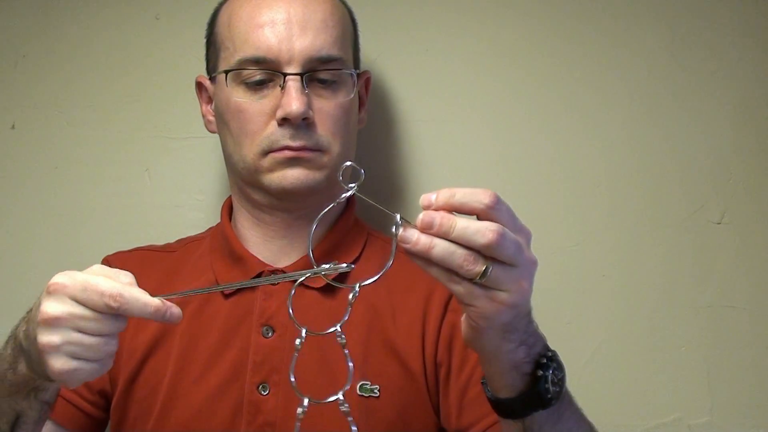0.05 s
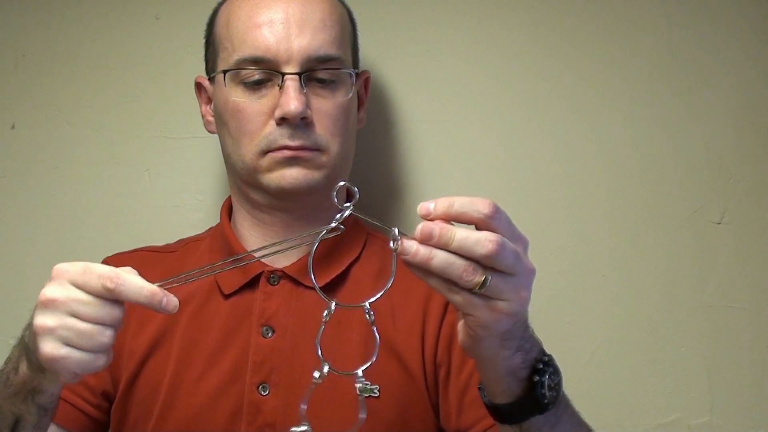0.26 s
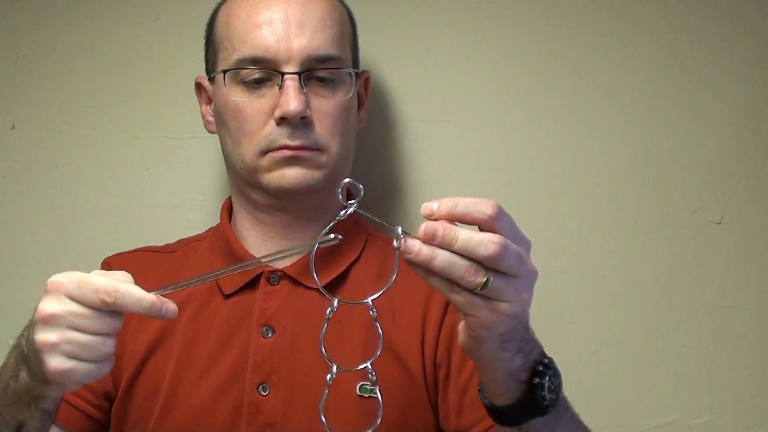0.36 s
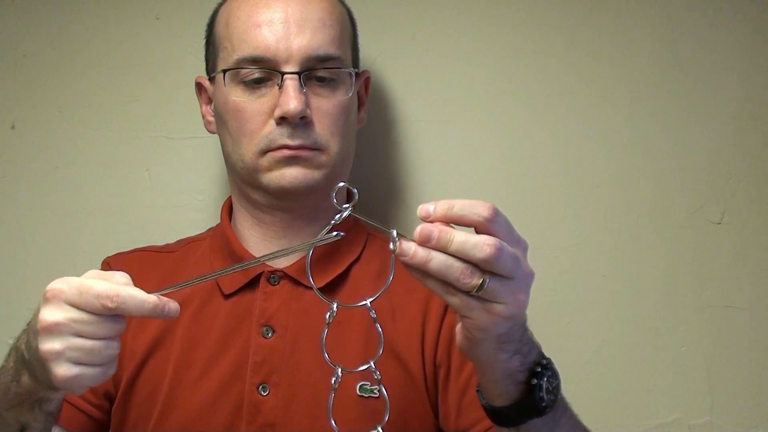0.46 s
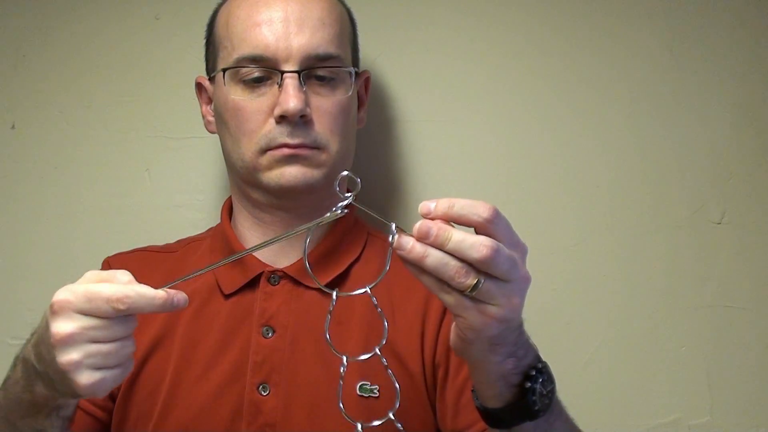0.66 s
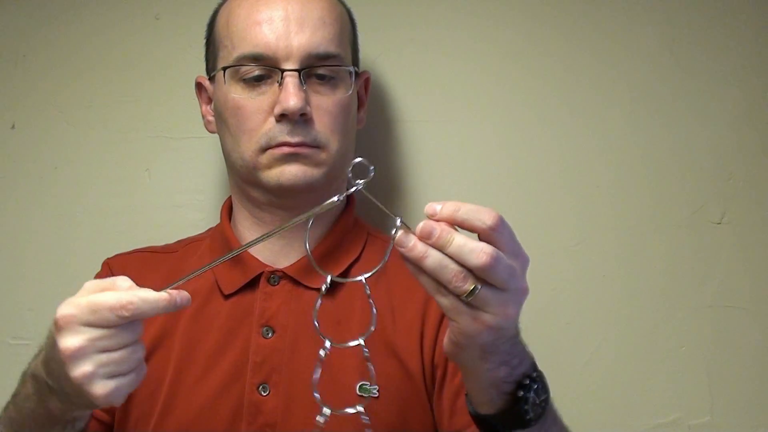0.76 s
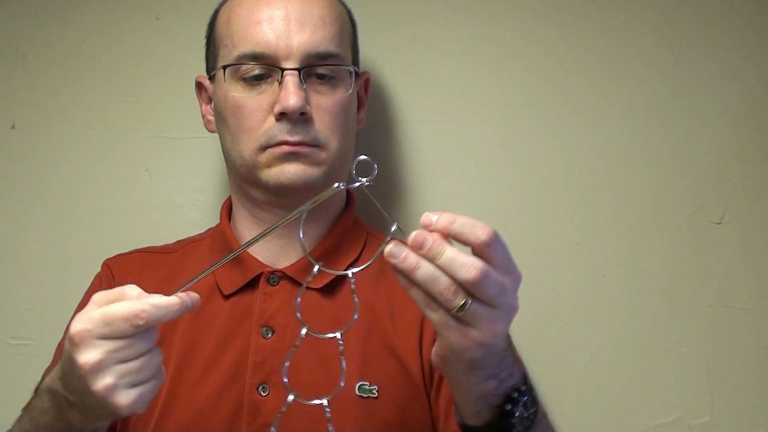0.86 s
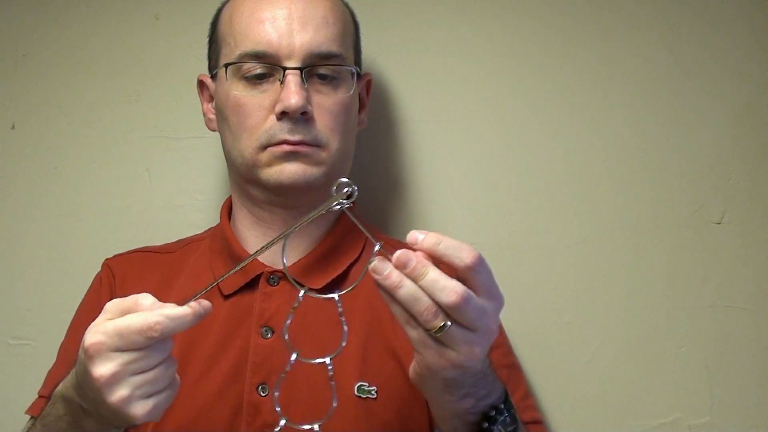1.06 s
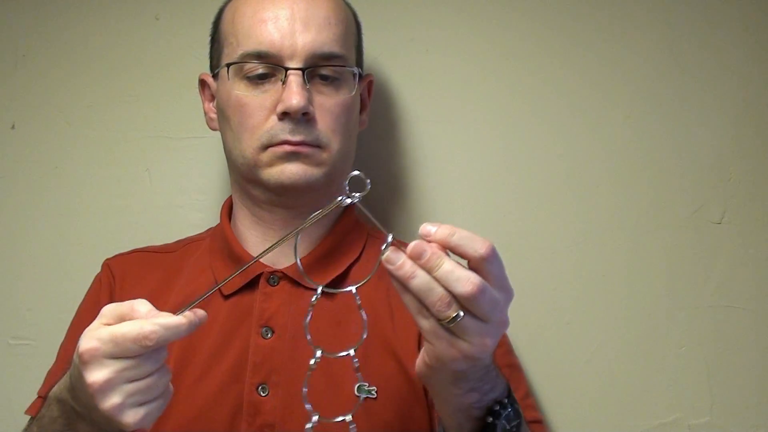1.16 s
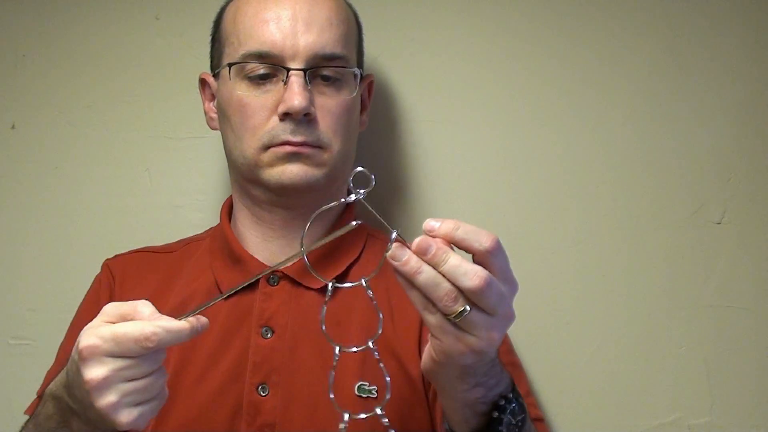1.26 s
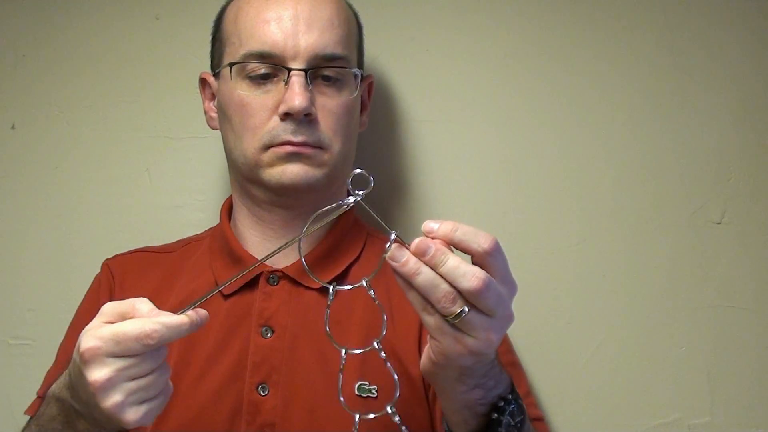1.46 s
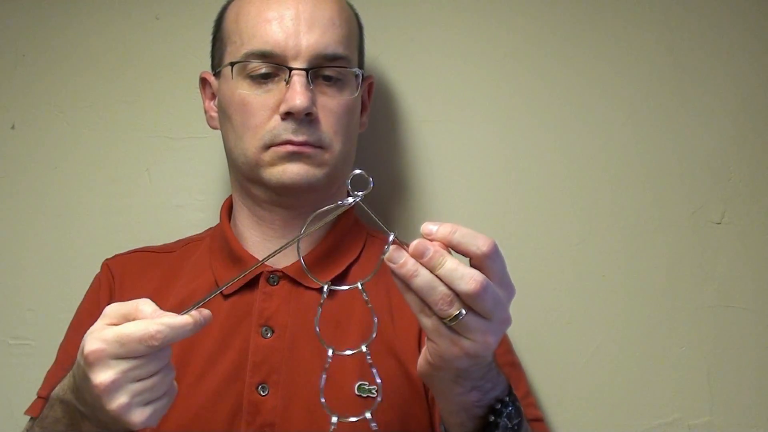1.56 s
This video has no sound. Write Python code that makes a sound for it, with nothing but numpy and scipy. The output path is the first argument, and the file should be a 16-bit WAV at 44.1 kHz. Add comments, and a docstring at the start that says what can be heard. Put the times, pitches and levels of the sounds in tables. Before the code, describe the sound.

A steel wire puzzle clinks close to the microphone, each knock bright and briefly ringing. A quick cluster comes at about 0.2 seconds, then the wires slide with a soft rasp until a clink at 0.6. Sharper clinks land around 0.9 and 1.0, lighter ones near 1.1, another sharp one at 1.3 and faint ticks at 1.5. Low room hiss and hum lie underneath.

```python
"""Bright steel clinks and short rings: a wire puzzle worked by hand, close to the microphone in a quiet room.
A long shuttle loop, a large hoop and a chain of hanging links knock together: each contact buzzes for
a few milliseconds and leaves the parts ringing. Between the early knocks the wires slide on each other.
Behind them lie room hiss, mains hum and a faint whine."""
import sys
import numpy as np
from scipy import signal
from scipy.fft import rfft, irfft
from scipy.io import wavfile

SR = 44100
rng = np.random.default_rng(int(sys.argv[2]) if len(sys.argv) > 2 else 0)


def unload_wav(signal):
    """Save mono or channel-first audio to the path in sys.argv[1] as 16-bit WAV at rate SR, clipped to [-1, 1]."""
    wavfile.write(
        sys.argv[1],
        SR,
        np.round(np.clip(np.atleast_2d(signal).T, -1, 1) * 32767).astype(np.int16),
    )


N = 70560
T = np.arange(N) / SR
HZ = np.maximum(np.arange(N // 2 + 1) * SR / N, 1)
OCTAVES = np.log2(np.maximum(HZ, 1000) / 10000)   # from 10 kHz, the middle of the wires' range
LEFT_RIGHT = np.array([[1], [-1]])


def from_db(db):
    """Decibels to gain."""
    return 10 ** (np.asarray(db) / 20)


def unit_rms(x):
    """Scale to unit rms."""
    return x / np.sqrt(np.mean(x ** 2) + 1e-20)


def along_hz(points):
    """A table of frequency_hz, level_db read at every frequency."""
    hz, db = np.transpose(points)
    return np.interp(np.log(HZ), np.log(hz), db)


def colour(x, db):
    """Filter by a gain curve."""
    return irfft(rfft(x) * from_db(db), N)


def resonate(x, hz, width_hz):
    """One resonance, at unit rms."""
    radius = np.exp(-np.pi * width_hz / SR)
    poles = [1, -2 * radius * np.cos(2 * np.pi * hz / SR), radius * radius]
    return unit_rms(signal.lfilter([1, 0, -1], poles, x + 1e-18))


def decay(age, t60_s):
    """Full level until age zero, then an exponential fall."""
    return np.exp(-np.log(1000) * np.maximum(age, 0) / t60_s)


# Room tone at the microphone: frequency_hz, density_db
ROOM_TONE = [(25, -18), (40, -4), (60, -7), (100, -5.5), (160, -4), (320, -3), (480, -5), (700, -6.3),
             (1200, -8), (2000, -9.5), (4000, -11), (7000, -11.5), (10500, -11), (15700, -13.5)]
# Its stereo width: frequency_hz, side_minus_mid_db
ROOM_TONE_WIDTH = [(30, -18), (70, -10), (125, -9.5), (250, -3), (500, 0.5), (1100, 1.5), (2200, -1),
                   (4400, -6.5), (8000, -9), (11000, -26), (15000, -48)]


def background(hiss_db=-58.5, hum_hz=120, hum_db=-78.5, whine_db=-75):
    """Rumble and hiss all round the microphone; mains hum and a faint whine in the centre."""
    mid, side = colour(rng.standard_normal((2, N)), along_hz(ROOM_TONE))
    hiss = (mid + colour(side, along_hz(ROOM_TONE_WIDTH)) * LEFT_RIGHT) / mid.std()
    hum = np.sqrt(2) * np.sin(2 * np.pi * (hum_hz * T + rng.random()))
    whine = resonate(rng.standard_normal(N), hz=3545, width_hz=58)
    return from_db(hiss_db) * hiss + from_db(hum_db) * hum + from_db(whine_db) * whine


def room_reflections(x, t60_s=0.27, delay_s=0.006, tilt_db_per_octave=-4):
    """The walls return a short diffuse tail, duller than the direct sound and wider towards the bass."""
    tails = rng.standard_normal((2, N)) * decay(T, t60_s) * (T > delay_s)
    tails /= np.sqrt(np.sum(tails ** 2, axis=1, keepdims=True))
    reflected = signal.fftconvolve(tails, x[None], axes=1)[:, :N]
    mid, side = colour(reflected, -5.5 + tilt_db_per_octave * OCTAVES)
    width_db = np.minimum(-16 - 3.5 * OCTAVES, 0)
    return mid + colour(side, width_db) * LEFT_RIGHT


# The wires' crowd of short modes, heard close up: frequency_hz, density_db
WIRE_SPECTRUM = [(1500, -27), (2300, -23.5), (3700, -16), (4700, -13), (5600, -5), (6800, -6), (7500, -1.5),
                 (8800, -3), (9800, 0), (11500, 1), (13200, -2.5), (14200, -7.5), (15700, -3.5)]


def wire_noise(excitation, tilt_db_per_octave=0, low_cut_hz=1370):
    """An excitation coloured by the wires' dense short modes, at unit rms."""
    coloured = colour(excitation, along_hz(WIRE_SPECTRUM) + tilt_db_per_octave * OCTAVES)
    low_cut = signal.butter(2, low_cut_hz, "high", fs=SR, output="sos")
    return unit_rms(signal.sosfilt(low_cut, coloured))


# Wire sliding on wire, close to the microphone: time_s, level_db
SLIDE_LEVELS = [(0.19, -68), (0.196, -52), (0.23, -52), (0.33, -55), (0.365, -57), (0.39, -50.5),
                (0.41, -62), (0.45, -74), (0.468, -61), (0.482, -63), (0.497, -52), (0.52, -62),
                (0.534, -52), (0.55, -60.5), (0.59, -80)]
# Resonances that sliding wakes: pitch_hz, level_db, width_hz
SLIDE_RESONANCES = [(5400, -4, 350), (7680, -3.5, 110), (8200, -2, 140), (8470, -1.5, 160), (9950, -5, 83),
                    (10460, -2, 200), (12090, -5, 30), (11950, -12, 64), (15400, -8, 100)]


def sliding(slips_per_s=6500):
    """Tiny random slips make the wires sing and rasp as they slide."""
    slips = (rng.random(N) < slips_per_s / SR) * rng.standard_normal(N)
    sing = unit_rms(sum(from_db(db) * resonate(slips, hz, width) for hz, db, width in SLIDE_RESONANCES))
    level_db = np.interp(T, *np.transpose(SLIDE_LEVELS), left=-np.inf, right=-np.inf)
    return from_db(level_db) * unit_rms(sing + wire_noise(slips))


# Modes of the large hoop: pitch_hz, level_db, t60_s
HOOP_MODES = [(5300, -18, 0.12), (5360, -16, 0.14), (5870, -18, .25), (8252, -10.5, 0.137),
              (10462, -15, .15), (11493, -4.5, 0.069), (11640, -8, 0.097), (7603, -6, .11),
              (7650, -1.5, .09), (9833, 0, .1), (9894, -8, .12), (12320, -2, 0.07), (12375, -7, 0.066),
              (12450, -5, .12), (14670, -15, 0.14), (15000, -9, .12), (15700, -12, 0.11)]
# Modes of the hanging links: pitch_hz, level_db, t60_s
LINK_MODES = [(2227, -17, 0.075), (4428, -9.5, 0.041), (5900, -11.5, .14), (6374, -8, 0.053),
              (7230, 3, 0.032), (8590, -18, 0.099), (10880, -4, 0.042), (10968, 2.5, 0.033),
              (11300, 5, 0.026), (12150, -2, 0.046), (14350, -4, 0.023), (14972, -2, 0.04)]
# Modes of the long shuttle loop: pitch_hz, level_db, t60_s
SHUTTLE_MODES = [(2336, -18, 0.11), (2920, -14.5, 0.07), (4480, -12.5, 0.073), (7100, -8, 0.1),
                 (7520, -6, 0.131), (8259, -7, 0.24), (9033, -2, 0.18), (9200, 2.5, 0.1), (9850, 2, 0.098),
                 (10560, -3, .1), (12100, -10, .13), (13500, -3.5, 0.089), (13337, 2, 0.097),
                 (14250, -2.5, 0.18)]


def ringing(part_dbs, rise_s=0.0011):
    """One knock sets hoop, links and shuttle ringing, each with its own strength."""
    age = T[:SR // 4]
    ring = np.zeros(len(age))
    for modes, part_db in zip((HOOP_MODES, LINK_MODES, SHUTTLE_MODES), part_dbs):
        hz, db, t60_s = np.transpose(modes)[:, :, None]
        waves = np.sin(2 * np.pi * (hz * age + rng.random(hz.shape)))
        ring += np.sum(from_db(part_db + db) * decay(age, t60_s) * waves, axis=0)
    return ring * (1 - np.exp(-age / rise_s))


# Steel knocking on steel, close to the microphone:
# start_s, clash_db, buzz_s, tilt_db_per_octave, hoop_db, link_db, shuttle_db
KNOCKS = [ (0.1112, -47, 0.0064, -0.5, -70, -66, -62), (0.201, -44, 0.0045, -4, -58, -67, -70),
          (0.2053, -35, 0.004, -1.5, -31.5, -52, -58), (0.2180, -32.5, .003, 6, -44, -45, -63),
          (0.2236, -30.5, 0.0086, 1, -29.5, -59, -52.5), (0.3059, -38, .0035, -1, -59, -58, -55),
          (0.5965, -42.5, 0.0041, -2, -63, -50.5, -60), (0.8488, -53.5, .004, -1, -74, -71.5, -76.5),
          (0.8927, -34.5, 0.0038, -0.5, -68, -38.5, -62), (0.969, -30.5, 0.0043, 1, -64, -57, -45.5),
          (0.98, -36, 0.0049, -.3, -53, -61, -48.5), (1.0921, -44.5, .002, 4.5, -72, -74, -66),
          (1.1140, -51.5, 0.00176, -2, -75, -74, -70), (1.128, -41.5, 0.0027, -1, -62, -68, -51.5),
          (1.1520, -62, 0.0017, 2, -77, -74, -73), (1.295, -33, 0.0044, 0.5, -42.5, -41.5, -60),
          (1.498, -50.5, .002, -1.5, -69, -73.5, -75), (1.506, -51.5, .002, 0, -70, -70, -74)]


def knocks(clash_t60_s=0.027):
    """The wires bounce on each other in a buzzing clash that dies fast, while the parts ring on."""
    clashes, rings = np.zeros((2, N))
    age = T[:SR // 12]
    for start_s, clash_db, buzz_s, tilt, *part_dbs in KNOCKS:
        start = int(start_s * SR)
        buzz = wire_noise(rng.standard_normal(N), tilt)[:len(age)]
        clashes[start:start + len(age)] += from_db(clash_db) * decay(age - buzz_s, clash_t60_s) * buzz
        ring = ringing(part_dbs)[:N - start]
        rings[start:start + len(ring)] += ring
    return clashes, rings


def scene(ring_send_db=-3.5):
    """The puzzle close up and straight ahead, with the quiet room behind it."""
    clashes, rings = knocks()
    ring_and_slide = rings + sliding()
    reflections = room_reflections(clashes + from_db(ring_send_db) * ring_and_slide)
    return clashes + ring_and_slide + reflections + background()


def record(dry):
    """The recorder cuts the top steeply."""
    cutoff_hz = 15750
    return colour(dry, -np.clip((HZ - cutoff_hz) / 6, 0, 90))


dry = scene()
out = record(dry)
unload_wav(out)
```